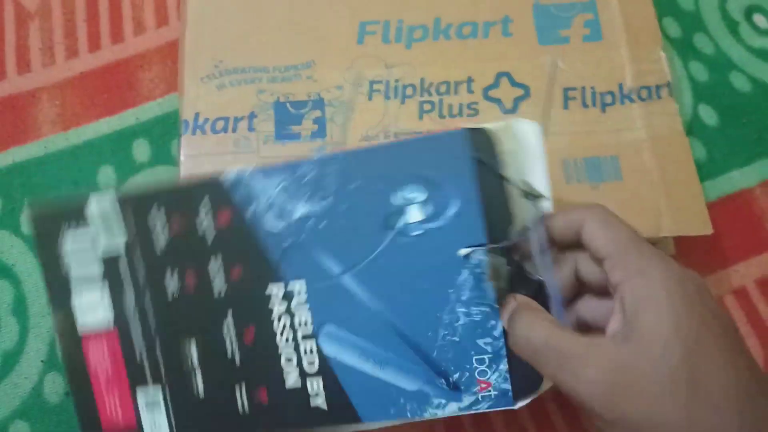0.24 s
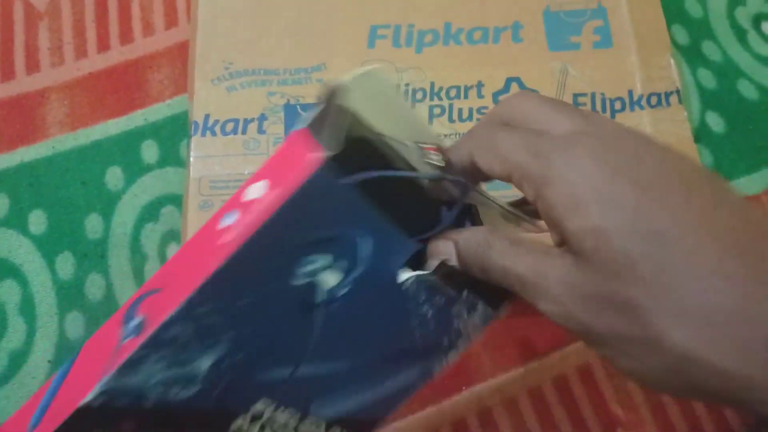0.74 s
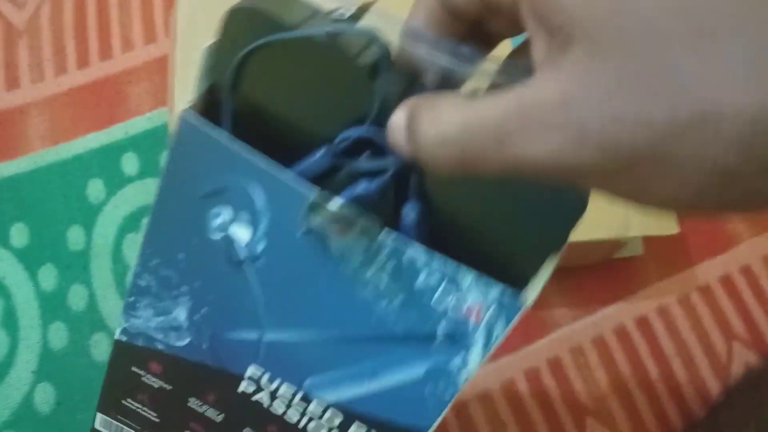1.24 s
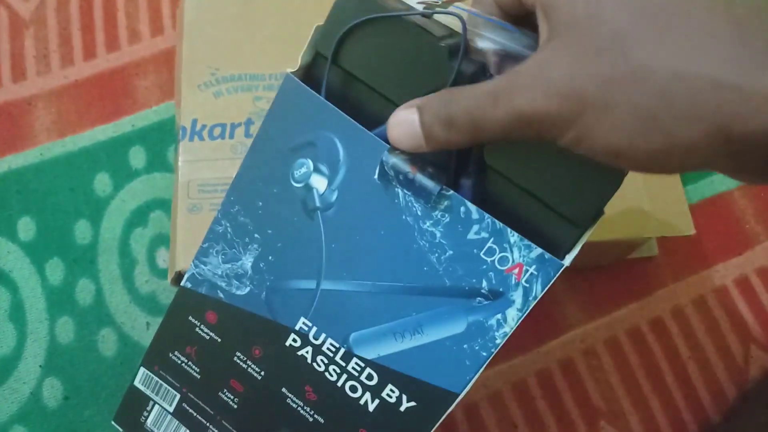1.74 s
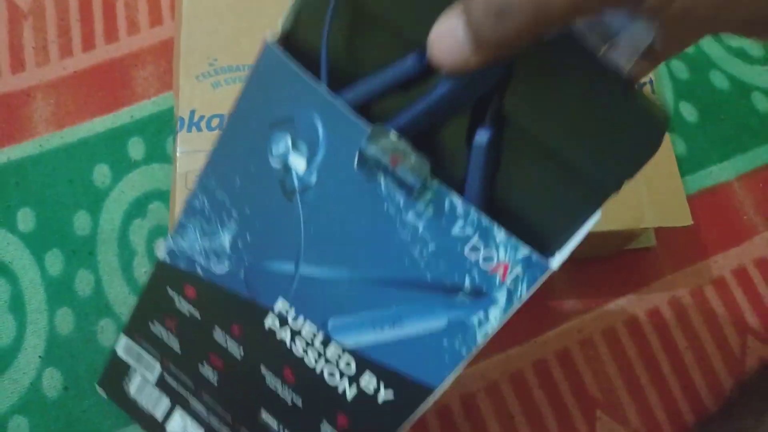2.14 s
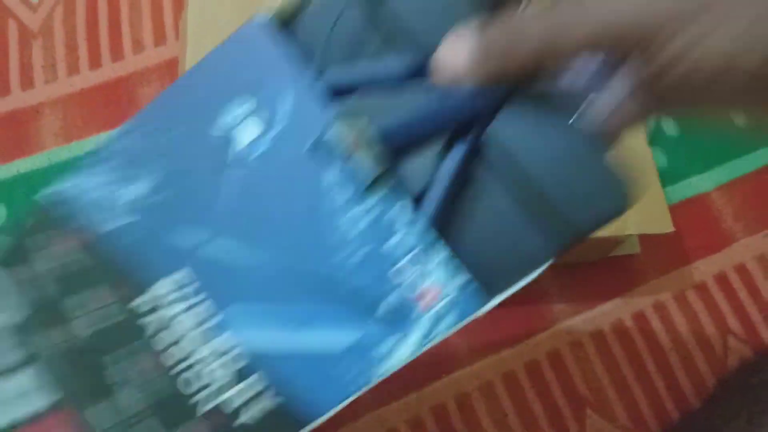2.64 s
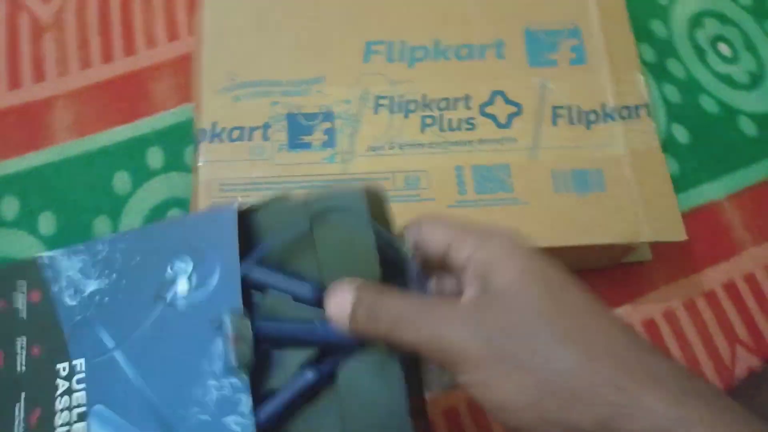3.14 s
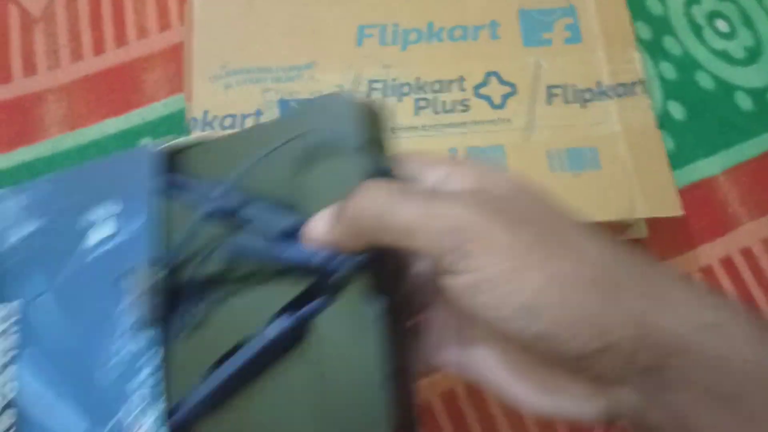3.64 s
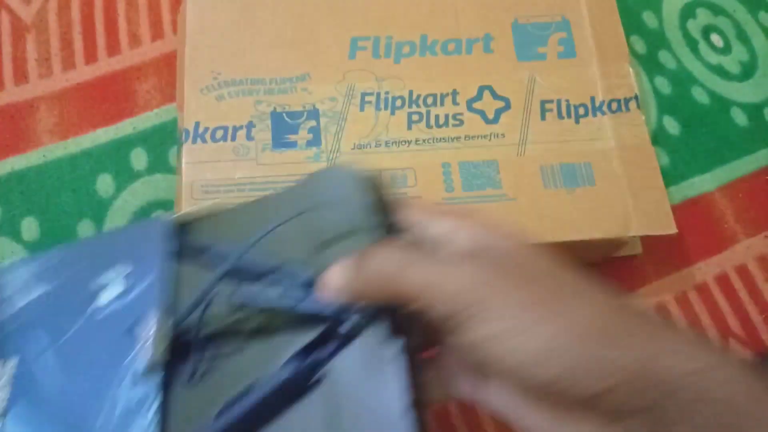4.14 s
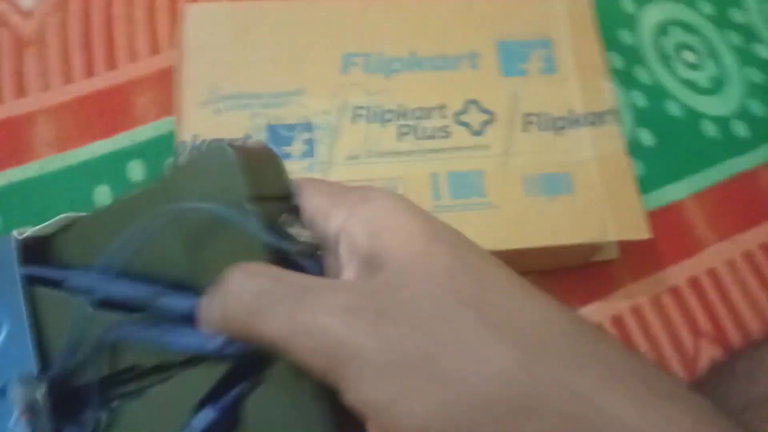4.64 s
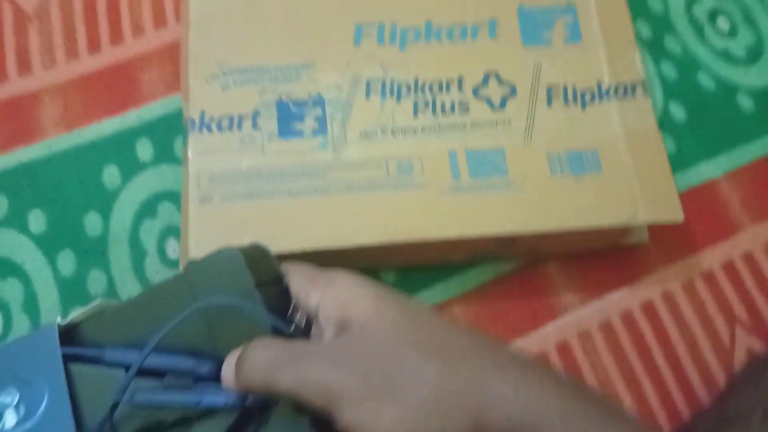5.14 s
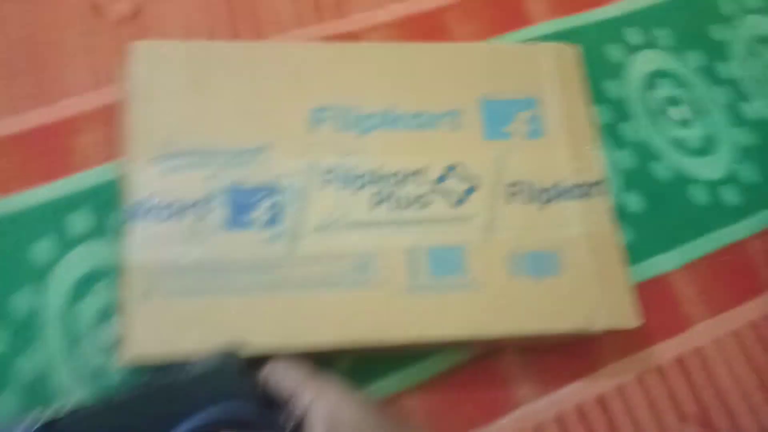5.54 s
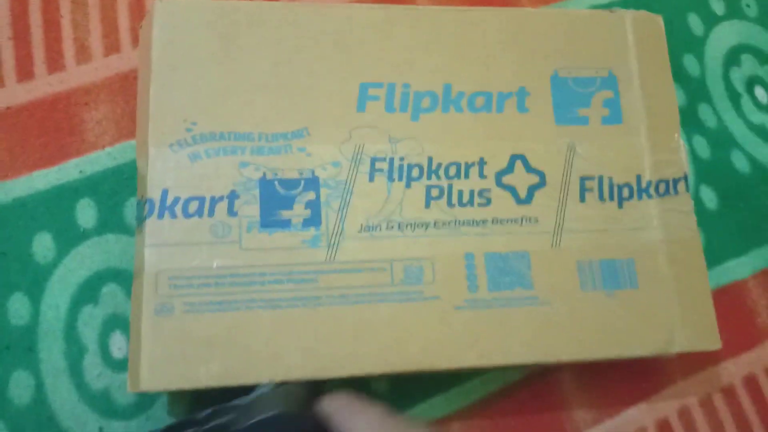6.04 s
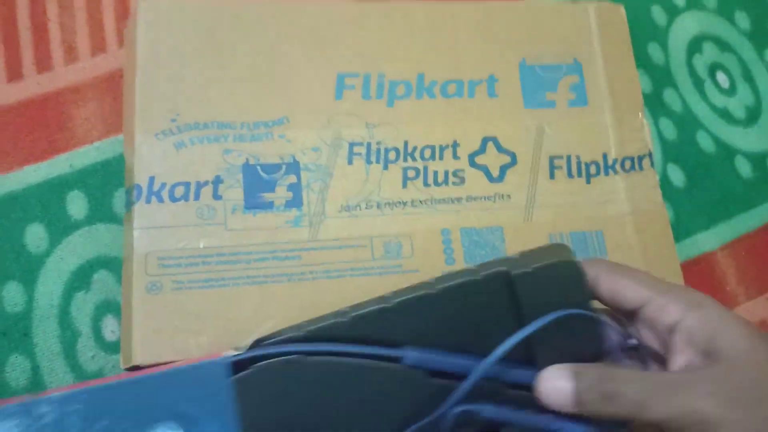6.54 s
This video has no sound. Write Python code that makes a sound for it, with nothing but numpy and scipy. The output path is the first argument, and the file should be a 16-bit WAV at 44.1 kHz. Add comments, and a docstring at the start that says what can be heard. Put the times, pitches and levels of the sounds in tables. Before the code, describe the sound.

A close, nearly mono sound of cardboard handled in a small room with a short, soft echo and a faint low hum and rumble. A scrape opens, with clicks and dull bumps around 0.3 s and ticks near 0.7 s. A stronger burst of scraping and hollow knocks comes at about 1.1 s, then lighter, sparse rustling until a rougher drag around 2.0 to 2.3 s. A crisp catch at 3.0 s leads into harder pulls at 3.2 to 3.6 s. At 3.64 s the tray lets go with the loudest, sharp crack and a short bright shiver. Irregular rubbing and ticking resume, getting busy from 4.6 s, with a soft low thud at 5.0 s and hollow knocks at 5.5 to 5.7 s. A steadier scrape with a bright tick comes near 6.2 s, then weak rustles and light bumps fade out.

```python
"""A small room: a cardboard earphone box is opened by hand over a table.
The inner tray scrapes out of its sleeve in fits and starts: friction noise follows a table of strokes.
Edges catch and tick and the hollow sleeve knocks: short noise bursts through resonances, plus soft bumps.
Once the tray snaps free and rings: decaying narrow noise. A faint low hum and rumble lie underneath."""
import sys
import numpy as np
from scipy import signal
from scipy.fft import rfft, irfft
from scipy.io import wavfile
from scipy.ndimage import uniform_filter1d

SR = 44100
rng = np.random.default_rng(int(sys.argv[2]) if len(sys.argv) > 2 else 0)


def int16_out(signal):
    """Quantize to a 16-bit WAV file."""
    q = np.round(np.clip(np.atleast_2d(signal).T, -1, 1) * 32767)
    wavfile.write(sys.argv[1], SR, q.astype(np.int16))


N = 299230
T = np.arange(N) / SR   # s
SNAP_S = 3.640   # the tray snaps free
USUAL_SCRAPE_DB = -54.5


def from_db(db):
    """Amplitude gain of a level in dB."""
    return 10 ** (np.asarray(db) / 20)


def rms_one(x):
    """Scale to an rms of 1."""
    return x / np.sqrt(np.mean(x ** 2) + 1e-20)


def steady(x):
    """Level 1 over every 50 ms: colour and grain are kept."""
    return x / np.sqrt(uniform_filter1d(x * x, size=2205) + 1e-12)


def gain_at(points, hz):
    """Gain of a spectrum table, interpolated in dB on a log-frequency axis."""
    table_hz, db = np.transpose(points)
    return from_db(np.interp(np.log(hz + 1), np.log(table_hz), db))


def colour(x, points):
    """Causal (minimum-phase) filter with the given spectrum, made by folding the cepstrum."""
    size = 4096
    log_gain = np.log(gain_at(points, np.fft.rfftfreq(size, 1 / SR)))
    cepstrum = irfft(log_gain)
    cepstrum[1:size // 2] *= 2
    cepstrum[size // 2 + 1:] = 0
    response = irfft(np.exp(rfft(cepstrum)))
    return signal.fftconvolve(x, response)[:len(x)]


def band(x, low_hz, high_hz, order=3):
    """Butterworth band-pass; the upper edge is capped at 0.45 SR."""
    edges_hz = [low_hz, min(high_hz, .45 * SR)]
    return signal.sosfilt(signal.butter(order, edges_hz, "band", fs=SR, output="sos"), x)


def resonate(x, modes):
    """Parallel two-pole resonances, each of peak gain 1 times its level."""
    out = 0
    for hz, width_hz, db in modes:
        radius = np.exp(-np.pi * width_hz / SR)
        zeros = np.array([1, 0, -1]) * (1 - radius * radius) / 2
        poles = [1, -2 * radius * np.cos(2 * np.pi * hz / SR), radius * radius]
        out = out + from_db(db) * signal.lfilter(zeros, poles, x)
    return out


def drift(rate_hz):
    """Random wander of rms 1: straight lines between rate_hz random knots a second."""
    knots = rng.standard_normal(8000)
    return rms_one(np.interp(T * rate_hz, np.arange(len(knots)), knots))


# rumble spectrum: (frequency [Hz], relative level [dB per Hz])
AIR_SPECTRUM = [(20, -9.5), (45, -12.5), (65, 1.5), (88, 1), (150, 4), (200, -5.5), (280, -16.5),
                (900, -20), (4000, -28), (5900, -32), (6500, -22), (7400, -40.5), (16000, -57.5)]
AIR_DB = -67.5   # rms
# hum tones: (frequency [Hz], median level [dB rms])
HUM_TONES = [(87, -66), (104, -69.5), (148, -75)]


def background():
    """Quiet room: coloured-noise rumble and low sines wavering in level and phase."""
    hum = 0
    for hz, db in HUM_TONES:
        level = from_db(db + 2.7 * drift(7)) * np.sqrt(2)
        hum = hum + level * np.sin(2 * np.pi * hz * T + 0.7 * drift(14))
    return hum + from_db(AIR_DB) * rms_one(colour(rng.standard_normal(N), AIR_SPECTRUM))


# pulls and shifts of the hand, card on card; the first row is the light grip while the box is held:
# (time of full speed [s], scrape [dB], rise [s], hold [s], release [s],
#  pressure on the panels [dB], bite of the edge [dB])
STROKE_ROWS = [(0.0, -69, .1, 6.45, .1, -4, -4.5), (0.0, -51.5, .05, 0.0079, 0.21, 5, 4.5),
               (0.272, -55.5, .08, .03, 0.27, 5.5, 13), (0.405, -61.5, 0.12, 0.054, 0.12, 8, 9),
               (0.706, -53, 0.17, .03, 0.27, 2.5, 12), (0.873, -52.5, 0.22, 0.014, 0.18, -0.5, -8),
               (1.04, -45, 0.14, 0.067, 0.19, -4.5, 4), (1.266, -55, 0.038, 0.0084, 0.067, 3.5, -8),
               (1.41, -64, 0.1, 0.11, 0.45, -1, -3), (1.628, -62, 0.018, 0.052, 0.045, -6, -4),
               (1.76, -65, 0.044, .01, .15, 6, -10), (2.01, -50.5, 0.32, 0.058, 0.4, -1.5, -0.5),
               (2.211, -48.5, 0.096, 0.041, 0.16, -3, 2), (2.453, -59, 0.16, 0.11, 0.15, -1, 2),
               (2.606, -53, 0.075, 0.026, 0.17, 2, 0), (2.875, -58, 0.26, 0.03, .2, -1.5, -4),
               (2.981, -55, 0.037, 0.067, 0.44, 5.5, 2), (3.194, -49.5, 0.16, .01, 0.16, 3, 2),
               (3.275, -49.5, 0.037, 0.056, 0.36, -1, -7), (3.463, -48.5, 0.12, .02, 0.1, -1.5, 7),
               (3.579, -47.5, 0.17, 0.046, 0.16, -1, 5.5), (3.658, -44, .02, .02, 0.37, -9, -3),
               (3.944, -57, 0.25, 0.08, 0.31, 1.5, 7), (4.131, -51.5, 0.09, 0.011, 0.33, 1.5, 6),
               (4.315, -60, 0.033, 0.011, 0.47, 4, 0), (4.492, -59.5, 0.017, 0.028, 0.092, 6.5, 10),
               (4.595, -51.5, .06, 0.039, 0.12, 3, 8), (4.748, -50.5, 0.17, 0.053, 0.13, 4.5, 3.5),
               (4.866, -50, 0.057, .01, 0.26, 3, 3.5), (4.997, -51, 0.015, 0.0079, 0.29, 4.5, -7),
               (5.19, -52, .1, .01, 0.22, 1, 3), (5.326, -61.5, 0.12, 0.035, 0.28, -4, 7),
               (5.497, -55.5, 0.036, 0.1, 0.18, 2, 5), (5.657, -47.5, 0.056, .01, 0.14, 2, -1),
               (5.778, -61.5, 0.045, 0.016, 0.26, 4.5, -9), (5.933, -52, 0.017, 0.031, 0.2, 5, -4),
               (6.152, -48.5, 0.25, 0.22, 0.1, -2.5, 4), (6.469, -60, 0.3, 0.041, 0.14, -3.5, 17.5)]
STROKE_FADE_DB = 23.5   # gained over the rise, lost over the release
PANEL_DB, RUB_DB, HISS_DB = -1.5, -9, -13   # hollow panels, hand rubbing, fine hiss; re scrape column
RUB_DB_PER_PRESSURE_DB = 2.31
HISS_DB_PER_SCRAPE_DB = 0.36   # extra hiss: fast sliding is brighter


def stroke_gains():
    """Strokes rise, hold and die away, adding in power; gains of scrape, panels, rubbing and hiss."""
    power = np.zeros((4, N))
    for s, db, rise_s, hold_s, release_s, pressure_db, bite_db in STROKE_ROWS:
        before = np.maximum(s - T, 0) / max(rise_s, .005)
        after = np.maximum(T - s - hold_s, 0) / max(release_s, .005)
        away = before + after   # in rise or release times
        heard = away < 4
        rub_db = RUB_DB + RUB_DB_PER_PRESSURE_DB * pressure_db
        layers_db = np.array([0, PANEL_DB + pressure_db, rub_db, HISS_DB + bite_db])
        power[:, heard] += from_db(db + layers_db[:, None] - STROKE_FADE_DB * away[heard]) ** 2
    scrape_re_usual = (power[0] + 1e-12) / from_db(USUAL_SCRAPE_DB) ** 2
    power[3] *= scrape_re_usual ** HISS_DB_PER_SCRAPE_DB
    return np.sqrt(power)


def friction(per_s, spread_db, clump_db, smooth):
    """Fibres slip as random tiny clicks over smooth noise; a wandering level clumps both."""
    sizes = from_db(spread_db * np.minimum(rng.exponential(1, N), 4)) * rng.choice([-1, 1], N)
    slips = rms_one(sizes * (rng.random(N) < per_s / SR))
    return (slips + smooth * rng.standard_normal(N)) * from_db(clump_db * drift(220))


def flexing(x, count=40, relative_width=0.034, depth=0.71, rate_hz=20):
    """As the point of contact moves, narrow resonances of the card swell and cancel in turn."""
    out = x.copy()
    for hz in np.geomspace(300, 8000, count) * np.exp(0.032 * rng.standard_normal(count)):
        out += depth * drift(rate_hz) * resonate(x, [(hz, relative_width * hz, 0)])
    return out


# resonances of the hollow sleeve: (frequency [Hz], width [Hz], level [dB])
SLEEVE_MODES = [(170, 48, -1.5), (357, 93, 8), (720, 250, 3.5), (1015, 420, 4), (1550, 340, 0.5),
                (2530, 450, -27.5), (4180, 340, -14.5), (6000, 2200, -9.5)]


def sleeve(x, stir_db=0.0):
    """The hollow sleeve adds its broad resonances to whatever touches it."""
    return x + from_db(stir_db) * resonate(x, SLEEVE_MODES)


# scrape colour: (frequency [Hz], relative level [dB per Hz])
SCRAPE_SPECTRUM = [(88, -29), (150, -18), (169, -3), (222, -3.5), (334, -6.5), (475, -6), (730, 5),
                   (1100, -5), (2140, -1), (3350, -3.5), (4760, -2.5), (6510, -6.5), (12900, -31.5),
                   (15100, -28.5), (16000, -19)]


def sliding(gains):
    """The tray drags along the sleeve: pressure brings out panels and rubbing, a biting edge the hiss."""
    scrape, panel, rub, hiss = gains
    drag = friction(per_s=5000, spread_db=3.0, clump_db=1.0, smooth=1.0)
    crinkle = from_db(-6.5) * friction(per_s=170, spread_db=3.0, clump_db=1.0, smooth=0)   # fibres snap
    edge = colour(drag + crinkle, SCRAPE_SPECTRUM)
    card = flexing(sleeve(edge, stir_db=-5.5))   # sliding stirs the sleeve less than a knock does
    return (from_db(-0.35) * scrape * steady(band(card, 1920, 6820))
            + panel * steady(band(card, 537, 1390))
            + rub * steady(band(card, 130, 600))
            + hiss * steady(band(card, 6960, 22000, order=5)))


# hand and box bumping softly: (time [s], peak level before BUMP_GAIN_DB [dB])
BUMP_ROWS = [(0.008, -48), (0.313, -37.5), (0.369, -44), (0.406, -41.5), (0.423, -45), (1.106, -40),
             (3.020, -43.5), (4.335, -51), (4.991, -29), (5.04, -42), (5.166, -38.5), (5.56, -52),
             (6.352, -44), (6.47, -55.5), (6.62, -55.5), (6.691, -47.5)]
BUMP_GAIN_DB = 3.5
# low modes they stir: (frequency [Hz], width [Hz], level [dB])
BUMP_RESONANCES = [(93, 27, 3), (147, 51, 11.5), (276, 42, 9)]


def bumps():
    """Soft pushes reach only the lowest modes of the box: impulses through band-limited resonances."""
    s, db = np.transpose(BUMP_ROWS)
    pushes = np.zeros(N)
    pushes[(s * SR).astype(int)] = from_db(db)
    thud = band(resonate(signal.unit_impulse(SR // 4), BUMP_RESONANCES), 71, 420, order=2)
    return signal.fftconvolve(pushes, from_db(BUMP_GAIN_DB) * thud / np.abs(thud).max())[:N]


SMALL_END_S = 6.5   # the lesser catches end; a few last catches and bumps follow
SMALL_DB, SMALL_SPREAD_DB = -54, 1.5   # at the usual scrape
SMALL_DB_PER_SCRAPE_DB = .95
SMALL_HARDNESS_DB_PER_OCTAVE, SMALL_CRUSH_MS = 1.0, .7   # mean, median


def small_catches(scrape, count=130, hardness_spread=2.0, hollow_spread_db=4):
    """Chance rows of lesser catches, spread up to SMALL_END_S, stronger where the scrape is strong."""
    s = (np.arange(count) + rng.random(count)) / count * SMALL_END_S
    strength, hard, hollow, crush = rng.standard_normal((count, 4)).T
    effort_db = 20 * np.log10(np.interp(s, T, scrape) + 1e-9) - USUAL_SCRAPE_DB
    level_db = SMALL_DB + SMALL_DB_PER_SCRAPE_DB * effort_db + SMALL_SPREAD_DB * strength
    hardness = SMALL_HARDNESS_DB_PER_OCTAVE + hardness_spread * hard
    crush_ms = SMALL_CRUSH_MS * np.exp(.5 * crush)
    return np.transpose([s, level_db, hardness, hollow_spread_db * hollow, crush_ms])


# parts of a catch (thump, knock, crack, tick, fizz):
# (low edge [Hz], high edge [Hz], share before tilt and normalising [dB],
#  part taken in the hollowness [ratio], slowness [ratio to crush time])
CATCH_BANDS = [(126.7, 489, -13.5, 0, 1.75), (487, 1220, -8.5, 1.0, 0.8), (1356, 4290, -4.5, 0.61, 1.37),
               (4300, 9000, -4.5, 0, 1.12), (8080, 36000, -17, 0.26, 0.67)]


def part_shares(hardness, hollow_db):
    """A hard contact tilts a catch to the treble, a hollow one lifts its middle; total power 1."""
    low_hz, high_hz, share_db, hollow_part, _ = np.transpose(CATCH_BANDS)
    octaves = np.log2(np.sqrt(low_hz * high_hz))
    tilt_db = np.outer(octaves, hardness)
    gains = from_db(share_db[:, None] + tilt_db + np.outer(hollow_part, hollow_db))
    return gains / np.linalg.norm(gains, axis=0)


def spot(burst, low_hz, high_hz, relative_width=0.16, ring_db=1.5):
    """Every touched spot favours a pitch of its own: one random resonance within the band."""
    hz = low_hz * (min(high_hz, 14000) / low_hz) ** rng.uniform(0.2, 0.865)
    return burst + resonate(burst, [(hz, relative_width * hz, ring_db)])


# edges catching and letting go: (time [s], level over 10 ms [dB], hardness [dB per octave],
#  hollowness before each part's ratio [dB], crush time before each part's slowness [ms])
CATCH_ROWS = [(0.2648, -44, 4.5, 0, 3.4), (0.2869, -39.5, -5.5, 0, 2.3), (0.3023, -46, 2, -3, 1.3),
              (0.3123, -40, -9, 15, 2.8), (0.5071, -56, -4, 2, .5), (0.6513, -43, 5, -1, 1.3),
              (0.6657, -43.5, 4.5, 1, 0.37), (0.7003, -36.5, 1, -7, 4.5), (0.7222, -41, 8.5, 14, 1),
              (0.7441, -40, 15, 0, 0.54), (0.7532, -43, -0.5, -6, .74), (0.7802, -47, 0, 2, 2.1),
              (1.0507, -35, 5, -11, 1.4), (1.0906, -36.5, -1.5, 0, 3.6), (1.1066, -32.5, 0, 6, 3.1),
              (1.1388, -37, -3, 7.5, 1.5), (1.2617, -48.5, -1.5, 4, 4.4), (1.2759, -45, -1, 8, 0.85),
              (1.4422, -52, 0, -4, 1.6), (1.501, -54, -5, 28, 7.9), (1.516, -49.5, 6, 3, 1.6),
              (1.6291, -46.5, 0, 7, 2), (1.6722, -55, 2, 0, 1.9), (1.7449, -49.5, 0, -5, 0.68),
              (1.7919, -39.5, -1, 9.5, 1.2), (1.8857, -51.5, 3, -6, 1.4), (2.2367, -46, 2, -1, 0.5),
              (2.3488, -50, 0.5, -6, 0.54), (2.382, -54.5, -5, -10, 1.8), (2.4335, -53, 2, 8, 2.3),
              (2.5, -53.5, 1, 1, 1), (2.5457, -42.5, 6.5, 22, 1.1), (2.6173, -40.5, 2, 20, 4.6),
              (2.7878, -50, 7.5, 6, 1.4), (2.902, -52, 2.5, 9, 1.2), (2.9807, -34.5, 0, 12, 2.8),
              (2.9845, -35.5, -3, 5, 0.57), (3.0598, -45, -2.5, 4, 5.2), (3.122, -47.5, 0.5, -11.5, 0.48),
              (3.183, -40.5, -1.5, 2.5, 1.1), (3.2581, -33, 0, 0, 1.4), (3.2739, -36.5, -1, 3, 3.1),
              (3.3386, -42.5, -1.5, 0, 2.4), (3.3662, -44.5, 0, 2, 2.6), (3.638, -21.5, 1, 4.5, 1.6),
              (3.6651, -35, 1.5, -9, 1.7), (3.8556, -45, 0.5, -3, 1.1), (3.9028, -45, 2.5, -16, .4),
              (4.0112, -48.5, 1.5, 4, 1.2), (4.062, -45.5, 3, 1, 1.4), (4.1448, -36.5, -0.5, -6.5, 1),
              (4.232, -47, -1.5, -1, 1.9), (4.3264, -45.5, -2.5, 3, 2.8), (4.4053, -48.5, 4, 9, 2.2),
              (4.498, -44, -1, 19, 2.9), (4.512, -44.5, 8.5, 2, 2.1), (4.5738, -44.5, -2, -6, 1.6),
              (4.5999, -39, 2, 0, 2), (4.651, -42.5, -2, -1, 1.2), (4.7075, -38, -4, 3, 3.7),
              (4.749, -39.5, -0.5, 6, 0.93), (4.8013, -37.5, -2, -3.5, 1.2), (4.853, -38, -3, 4, 1.7),
              (4.8648, -34, -1.5, -3, 1.5), (4.9004, -42.5, -0.5, 2, 0.88), (4.9943, -32, -1.5, -2.5, 1.9),
              (5.1655, -39.5, -1.5, 1, 1.5), (5.273, -49.5, 4, 0, 0.9), (5.3353, -50, 0, -3, 0.9),
              (5.4824, -41, -5, 7.5, 2.1), (5.5058, -40.5, -5, 10, 1.9), (5.5328, -33, -3, 3.5, 1.8),
              (5.6296, -33, -2, -3.5, 1.6), (5.6511, -37.5, -2, 3, 1.6), (5.6979, -47.5, 1.5, 1, .64),
              (5.773, -52.5, -2, -6, 1.2), (5.93, -37, -4.5, -4, 1.8), (5.9404, -42.5, 0.5, 1, 2.7),
              (5.9523, -38, -4, -4.5, 3.2), (6.079, -49.5, -3.5, 0, 1.4), (6.206, -32.5, 2.5, -19, 0.87),
              (6.235, -44.5, -3, -4, 0.66), (6.3568, -45, -2.5, 0.5, 6), (6.546, -55, -4.5, 8.5, 2.5),
              (6.6708, -50.5, -8, -8.5, 2)]
# catch colour: (frequency [Hz], relative level [dB per Hz])
CRACK_SPECTRUM = [(100, 2.5), (300, 9), (950, 5.5), (1400, 3.5), (1950, -2.5), (2500, 1), (3300, -1),
                  (4300, 5.5), (6800, 5.5), (8200, -9), (10000, -13.5), (12500, -28), (16000, -16.5)]


def catches(rows, after_db=-24, after_s=0.021, spike_db=2.0, release_power=1.05):
    """Fibres crush for a few ms: panels thump and knock, the edge cracks, ticks and fizzes."""
    size = 4096
    t = T[:size]
    s, level_db, hardness, hollow_db, crush_ms = np.transpose(rows)
    fibres = rng.standard_normal((len(s), 2, size))
    slips = fibres[:, 0] * from_db(spike_db * np.clip(fibres[:, 1], -2, 2))
    body = sleeve(colour(signal.unit_impulse(size // 2), CRACK_SPECTRUM))
    flutter = from_db(after_db) * np.exp(-t / after_s)
    to_10_ms = np.sqrt(SR / 100 / size)   # rms over the burst to level over 10 ms
    out = np.zeros(N + size)
    for (low_hz, high_hz, _, _, slowness), share in zip(CATCH_BANDS, part_shares(hardness, hollow_db)):
        age = t / (np.maximum(crush_ms, .2)[:, None] * slowness / 1000)
        # the grip builds fast, holds, gives way, and leaves a faint flutter
        grip = (1 - np.exp(-3 * age)) * (np.exp(-(age / 2) ** release_power) + flutter)
        response = band(body, low_hz, high_hz, order=4)
        bursts = signal.fftconvolve(slips * grip, response[None], axes=1)[:, :size]
        for start_s, gain, burst in zip(s, from_db(level_db) * share, bursts):
            at = int(start_s * SR)
            out[at:at + size] += gain * rms_one(spot(burst, low_hz, high_hz)) * to_10_ms
    return out[:N]


SHIVER_DB, SHIVER_T60_S = -35, 0.31   # before each resonance's level and share
# tray resonances: (frequency [Hz], width [Hz], level [dB re SHIVER_DB], share of the ring time [ratio])
TRAY_MODES = [(700, 240, -9.5, 1), (1068, 39, -9, 0.81), (2280, 40, 2, 0.45), (2550, 120, 4.5, 0.69),
              (2960, 90, -21.5, .8), (3870, 170, -1, 1.1), (4820, 67, -3, 0.64), (6050, 650, -3, 0.55)]


def tray():
    """Let go at once, the stiff tray shivers on: narrow noise bands, each dying at its own pace."""
    age_s = T - SNAP_S
    out = 0
    for hz, width_hz, db, share in TRAY_MODES:
        decay_db = -60 * np.abs(age_s) / (share * SHIVER_T60_S)
        dying = (age_s > 0) * from_db(SHIVER_DB + db + decay_db)
        out = out + dying * steady(resonate(rng.standard_normal(N), [(hz, width_hz, 0)]))
    return out


def room(x, t60_s=0.41, treble_t60_s=0.099, wet_db=-11, treble_wet_db=-14):
    """Dense wall echoes build up after a few ms, as decaying noise; the treble dies first."""
    t = T[:SR // 2]
    walls = rng.standard_normal(len(t)) * np.clip((t - .004) / 0.0071, 0, 1)
    low, high = [rms_one(walls * from_db(-60 * t / decay_s)) / np.sqrt(len(t))
                 for decay_s in (t60_s, treble_t60_s)]
    echo = from_db(wet_db) * band(low, 85, 5200, order=2)
    echo = echo + from_db(treble_wet_db) * band(high, 4000, 9000, order=2)
    return x + signal.fftconvolve(x, echo)[:N]


# stereo side signal: (frequency [Hz], side re mid [dB])
SIDE_SPECTRUM = [(20, -60), (100, -71), (3000, -67.5), (4100, -50), (4800, -63), (8000, -44), (16000, -15)]


def stereo(x, snap_lean=.55, snap_scatter_db=-2, snap_width_s=0.018, split_hz=5000):
    """Nearly mono; around the snap the treble spreads wide and leans right."""
    size = 128
    hz = np.fft.rfftfreq(N, 1 / SR)
    scatter = rms_one(rng.standard_normal(size) * np.linspace(1, 0, size)) / np.sqrt(size)
    scattered = signal.fftconvolve(x, scatter)[:N]
    side = irfft(rfft(scattered) * gain_at(SIDE_SPECTRUM, hz), N)
    treble = np.clip((hz - split_hz) / 2000, 0, 1)
    apart = irfft(rfft(snap_lean * x + from_db(snap_scatter_db) * scattered) * treble, N)
    side -= apart * np.exp(-((T - SNAP_S) / snap_width_s) ** 2)
    return np.array([x + side, x - side])


def scene():
    """The box is handled close to the microphone; the handling excites the room."""
    gains = stroke_gains()
    all_catches = np.vstack([CATCH_ROWS, small_catches(gains[0])])
    handling = sliding(gains) + bumps() + catches(all_catches) + tray()
    return stereo(room(handling) + background())


def record(dry):
    """Steep elliptic low-pass at 16 kHz (0.2 dB ripple, 70 dB stop band)."""
    return signal.sosfilt(signal.ellip(10, .2, 70, 16000, fs=SR, output="sos"), dry)


dry = scene()
out = record(dry)
int16_out(out)
```